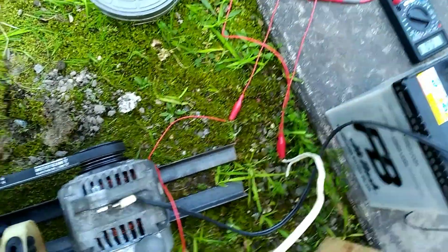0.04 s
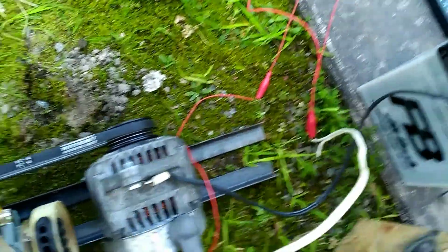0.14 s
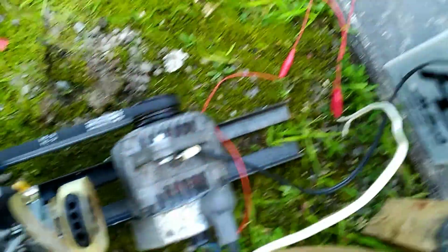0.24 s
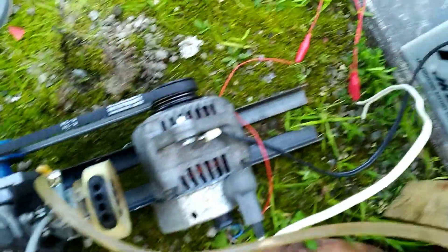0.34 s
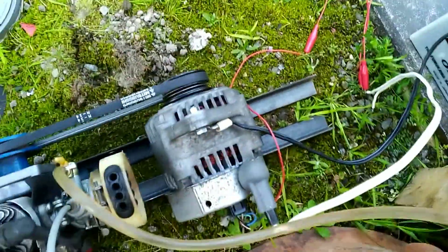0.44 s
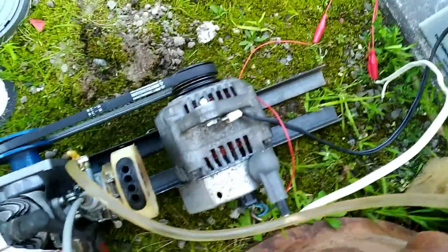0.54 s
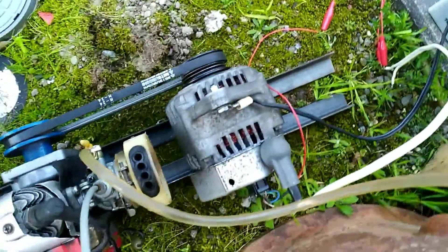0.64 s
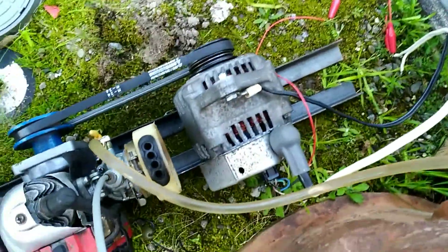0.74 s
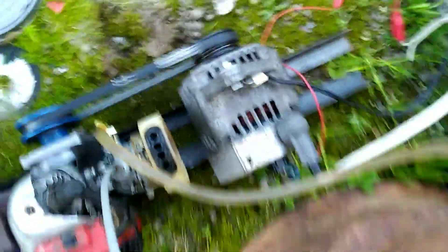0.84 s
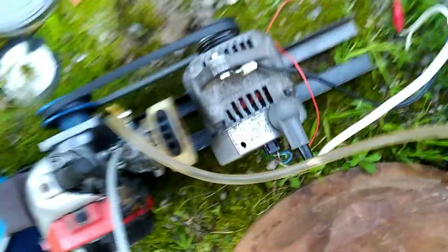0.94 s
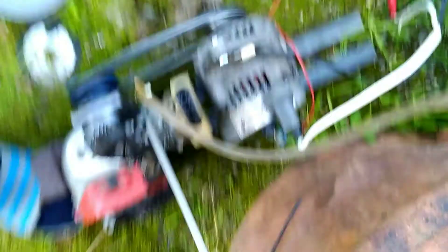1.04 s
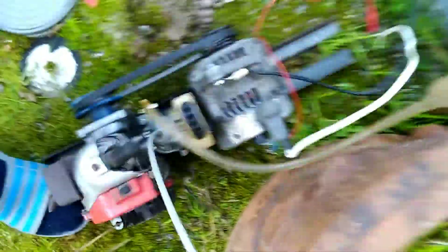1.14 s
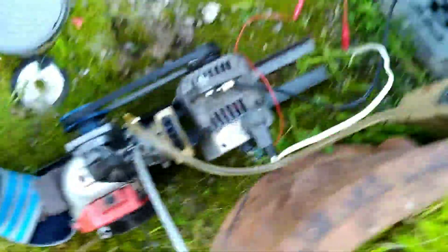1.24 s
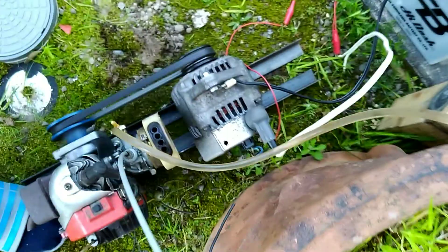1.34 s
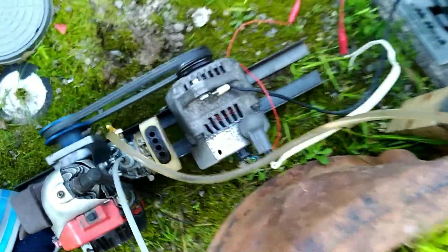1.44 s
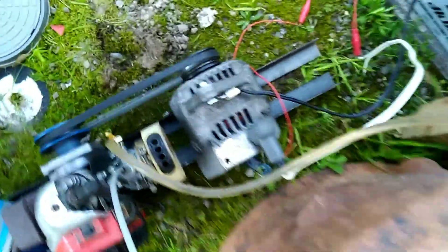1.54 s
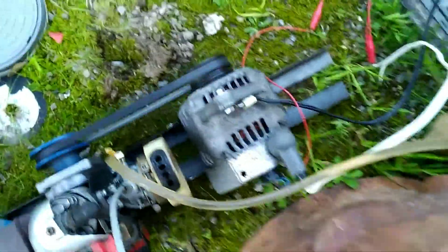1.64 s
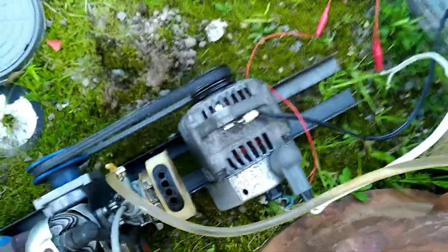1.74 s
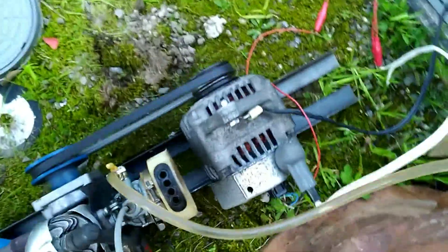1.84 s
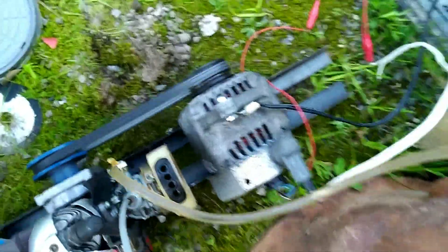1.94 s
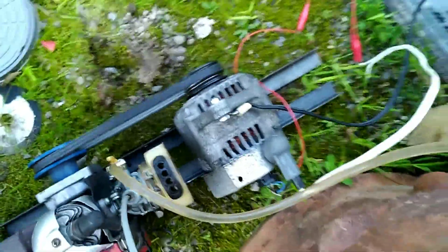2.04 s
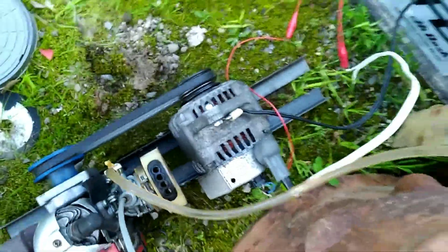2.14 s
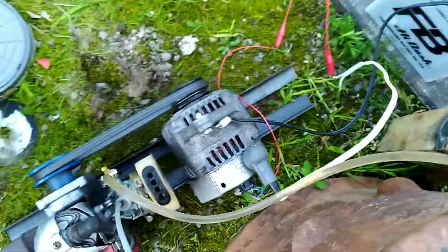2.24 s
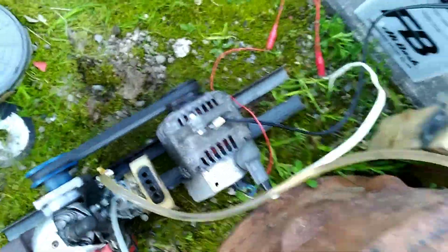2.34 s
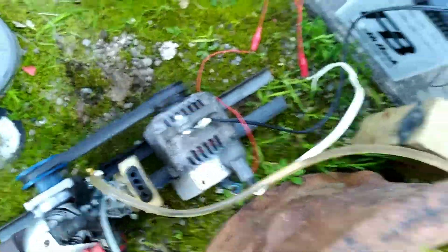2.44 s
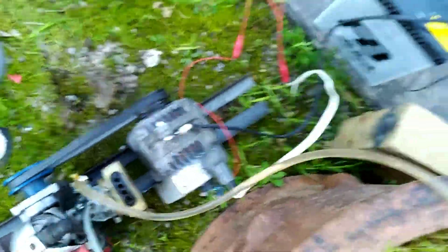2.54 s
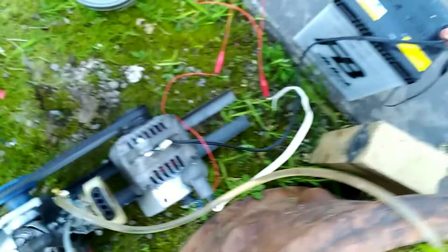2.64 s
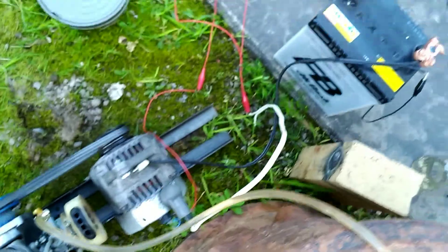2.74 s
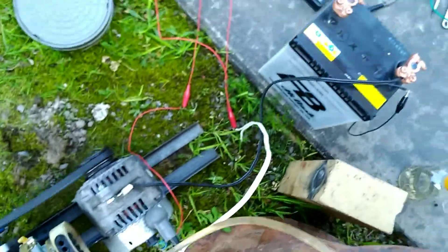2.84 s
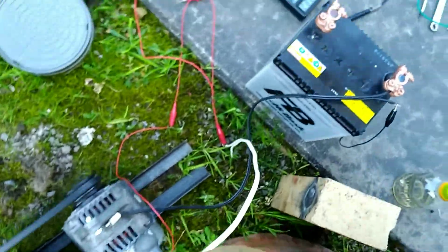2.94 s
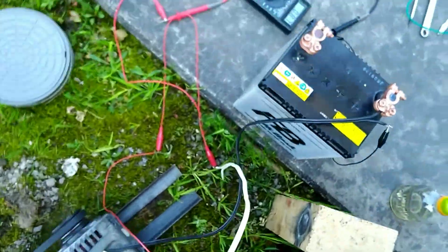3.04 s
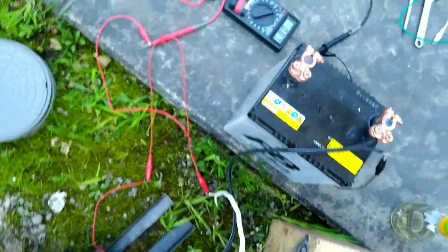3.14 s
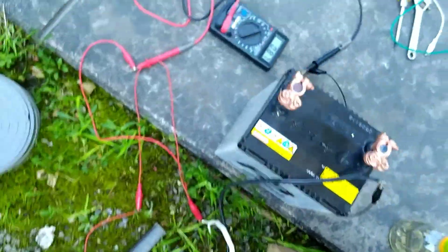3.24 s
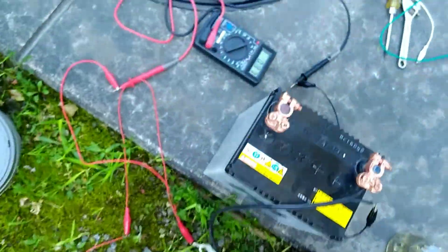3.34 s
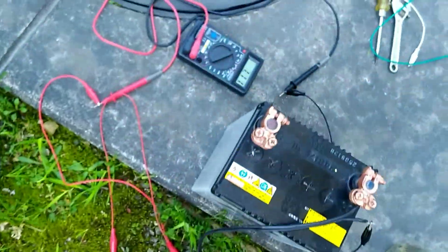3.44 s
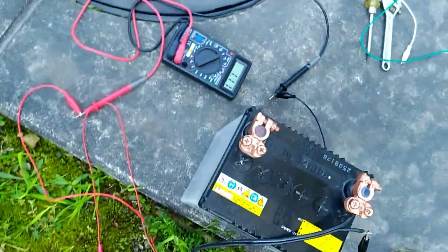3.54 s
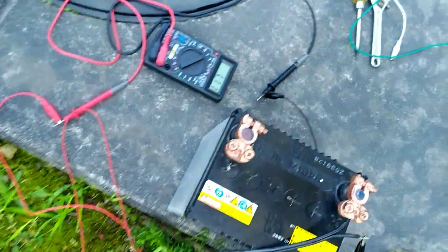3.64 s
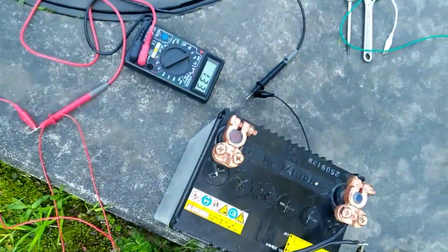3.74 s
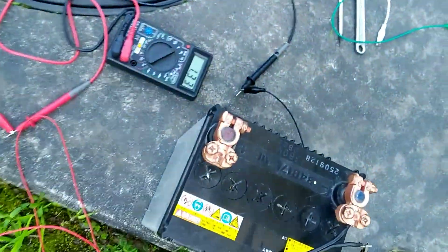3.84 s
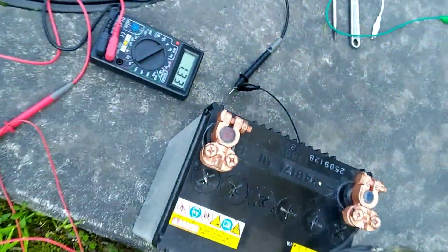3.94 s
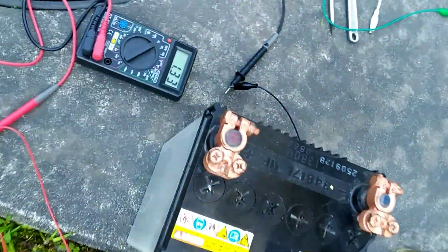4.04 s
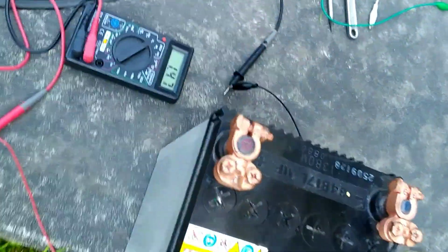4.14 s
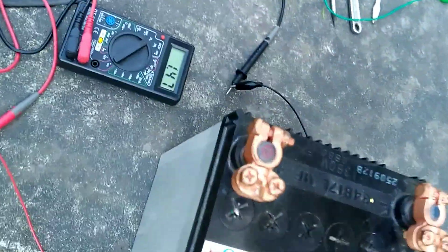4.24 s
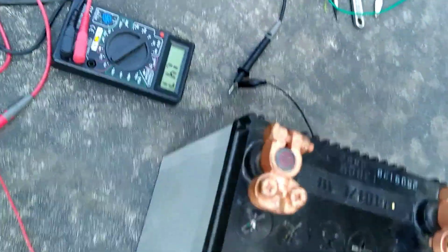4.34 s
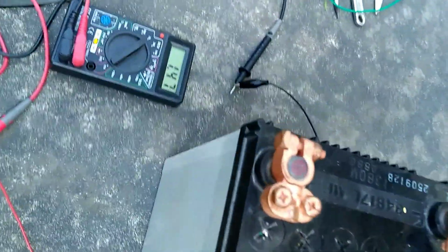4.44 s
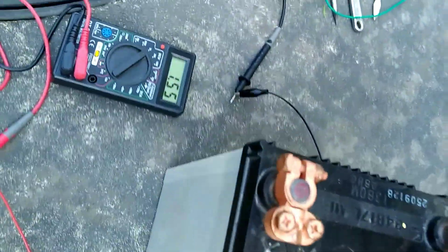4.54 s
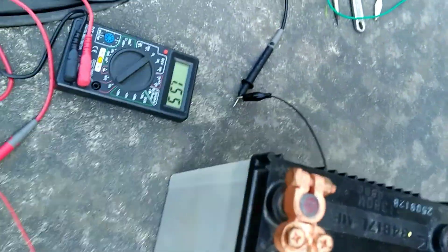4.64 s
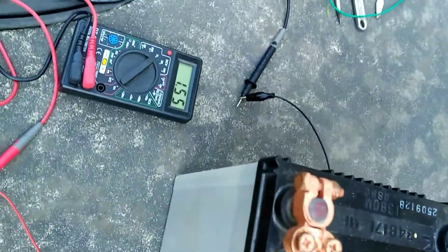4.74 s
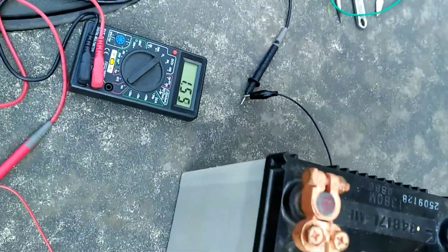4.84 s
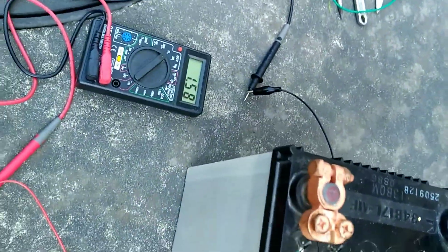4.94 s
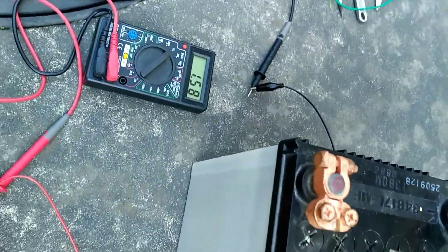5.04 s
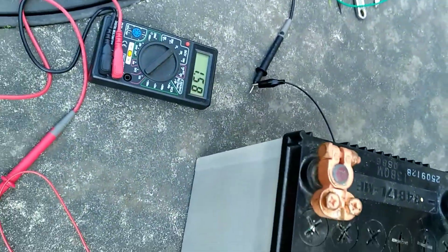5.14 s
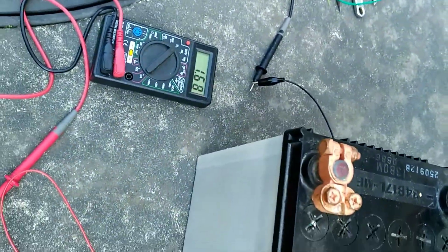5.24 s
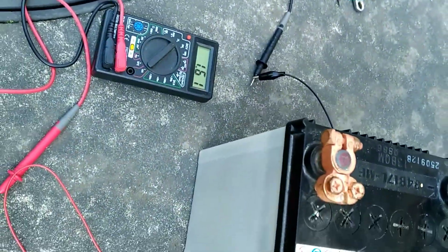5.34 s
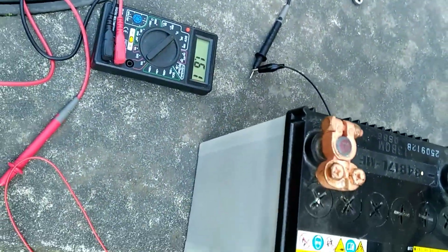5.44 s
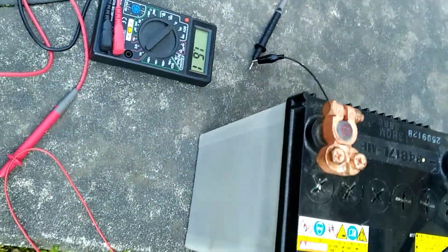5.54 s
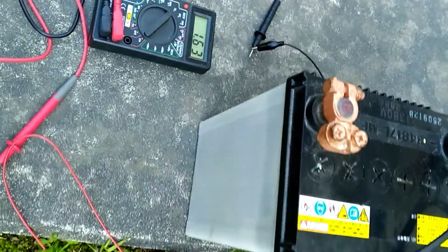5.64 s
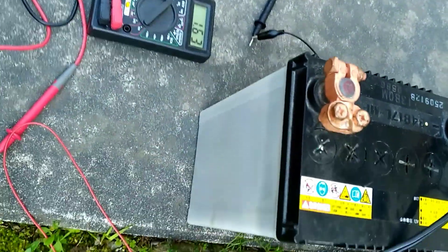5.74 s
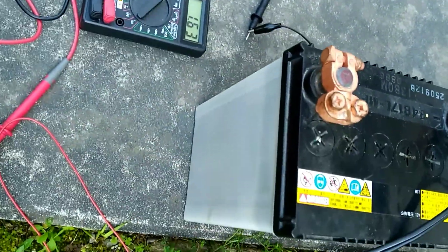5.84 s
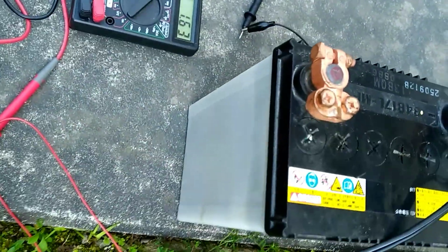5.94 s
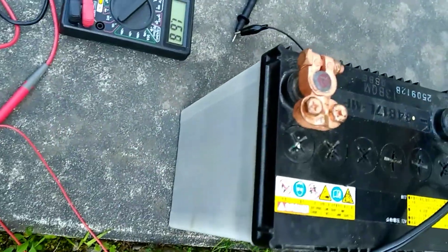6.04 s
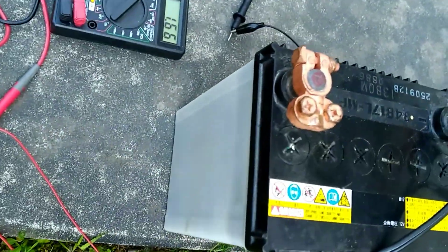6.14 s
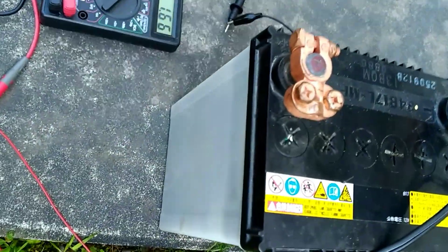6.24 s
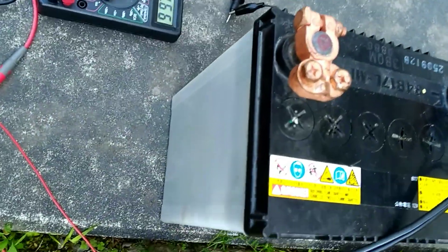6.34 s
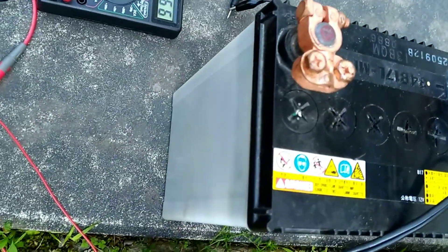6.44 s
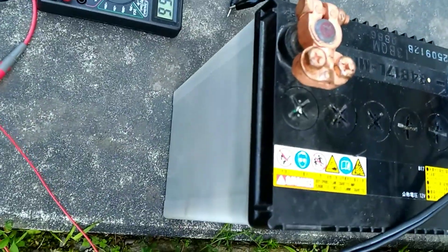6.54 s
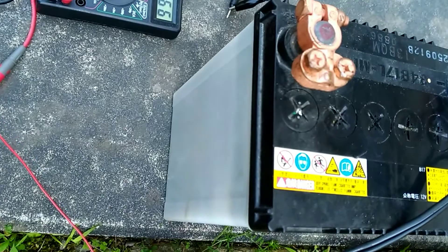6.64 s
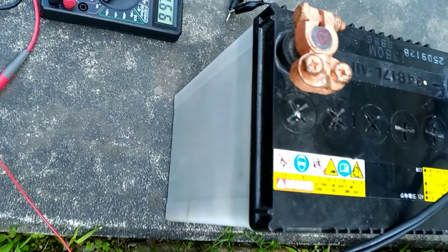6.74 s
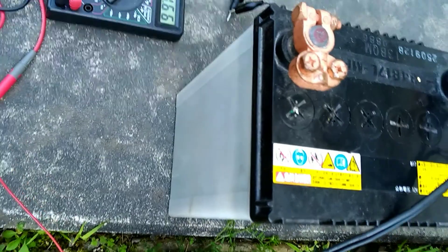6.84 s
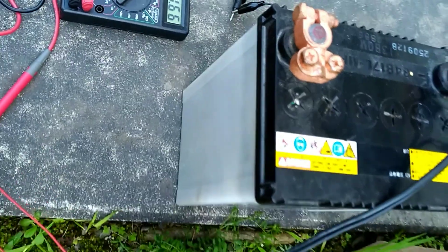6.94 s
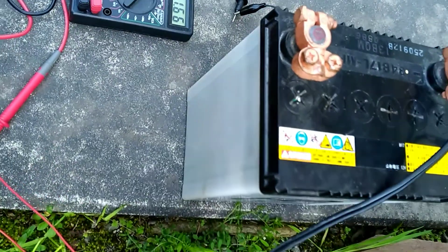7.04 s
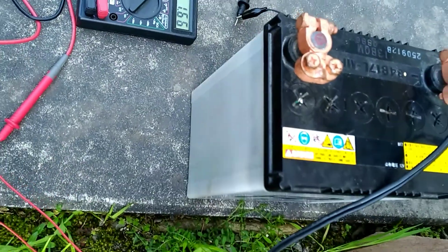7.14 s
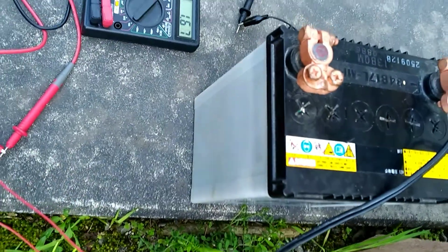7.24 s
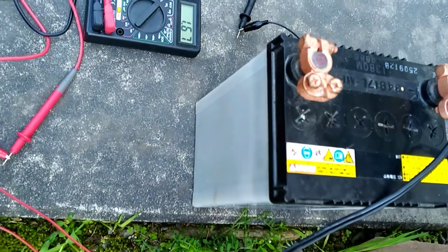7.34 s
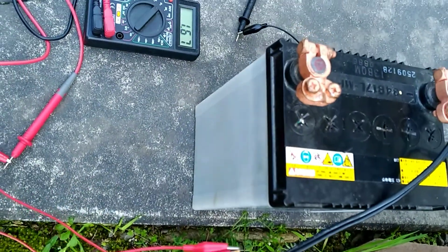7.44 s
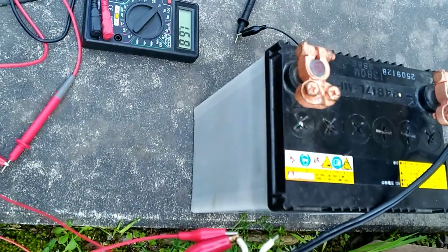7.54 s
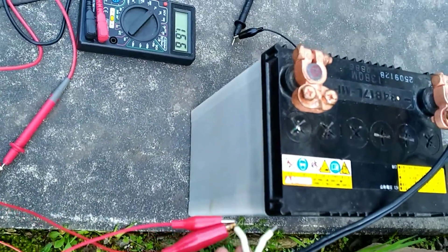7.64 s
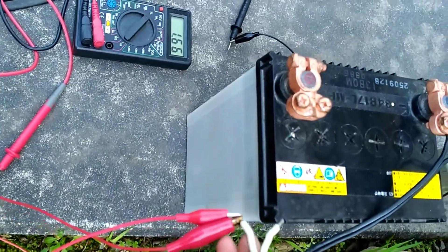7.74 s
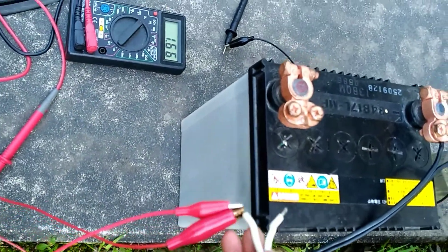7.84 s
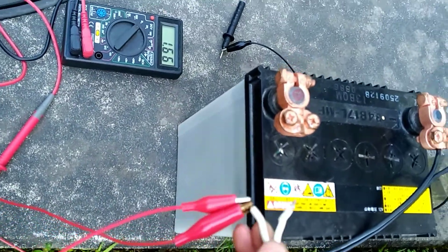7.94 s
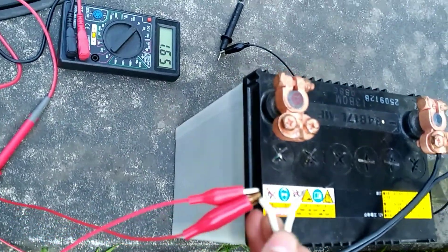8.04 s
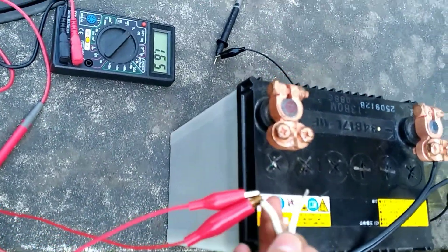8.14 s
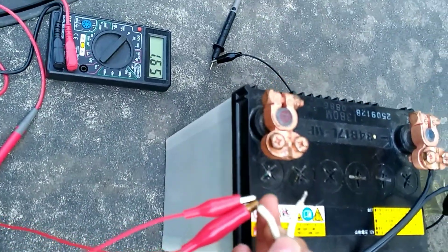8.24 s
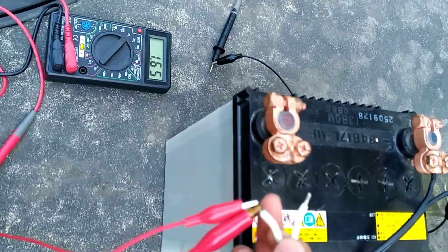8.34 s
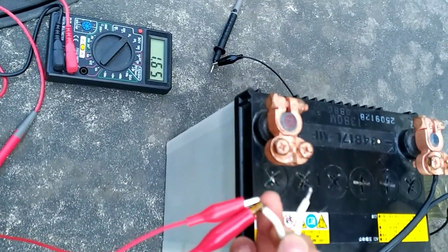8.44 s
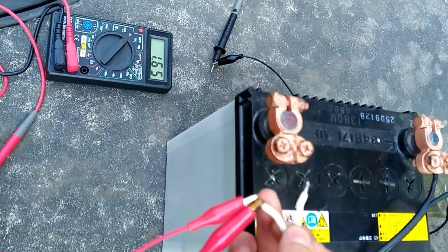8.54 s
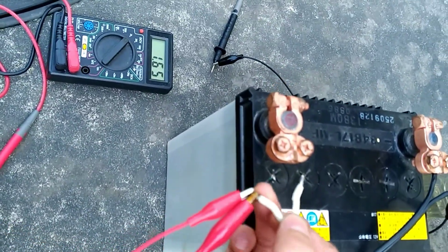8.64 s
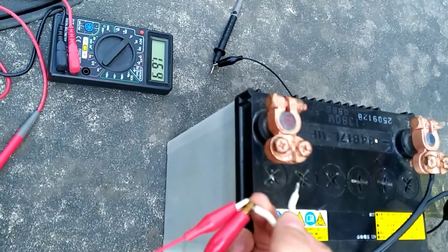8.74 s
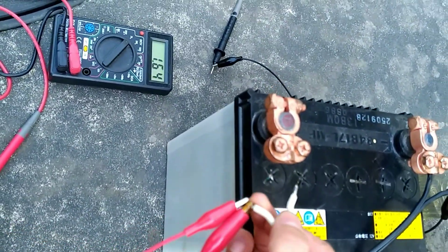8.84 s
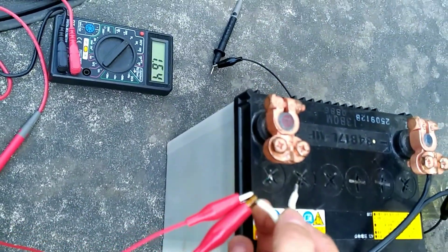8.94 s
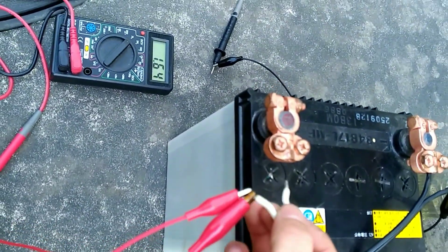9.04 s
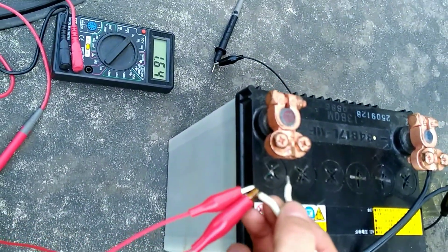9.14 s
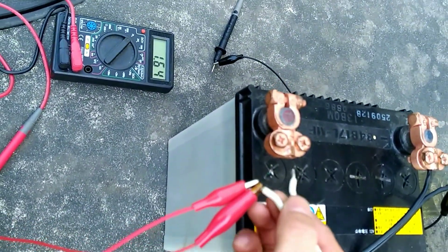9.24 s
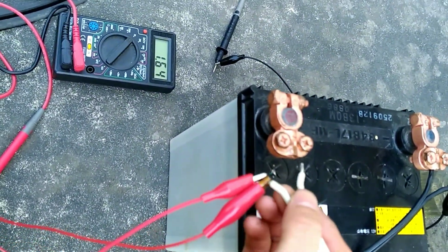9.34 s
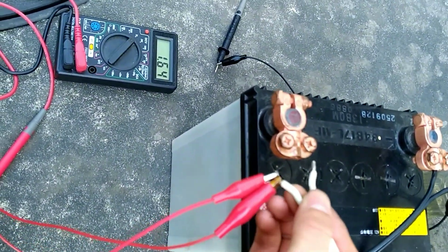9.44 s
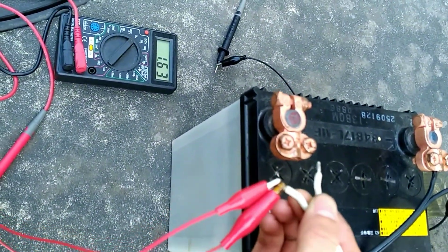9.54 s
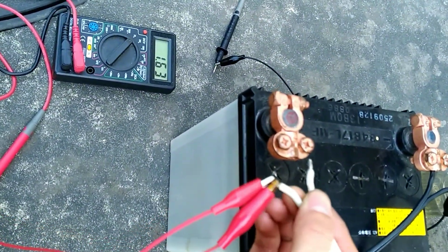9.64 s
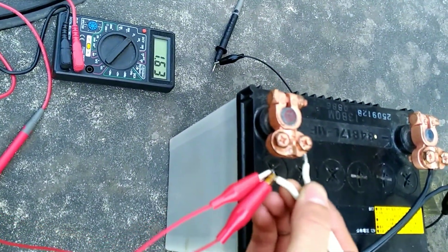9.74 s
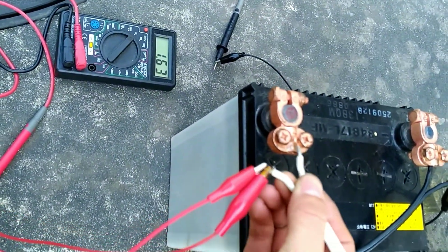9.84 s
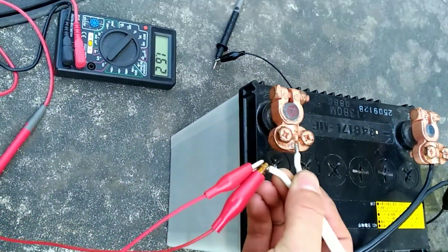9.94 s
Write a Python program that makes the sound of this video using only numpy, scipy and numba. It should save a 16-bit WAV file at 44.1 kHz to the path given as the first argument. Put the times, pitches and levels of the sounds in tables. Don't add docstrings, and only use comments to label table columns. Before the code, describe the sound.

After a quiet moment, a small petrol engine is cord-started outdoors, sputters and clangs, then rattles along steadily with barking intake and belt hiss.

```python
import sys
import numpy as np
from scipy import signal
from scipy.fft import rfft, irfft
from scipy.io import wavfile
from scipy.ndimage import uniform_filter1d, map_coordinates
from numba import njit

SR = 44100
rng = np.random.default_rng(int(sys.argv[2]) if len(sys.argv) > 2 else 0)


def waveform_to_disk(signal):
    frames = np.transpose(np.atleast_2d(signal))
    scaled = np.clip(frames, -1, 1) * 32767
    samples = np.round(scaled).astype(np.int16)
    wavfile.write(sys.argv[1], SR, samples)


def level_to_linear(level):
    exponent = np.asarray(level, float) / 20
    return 10 ** exponent


N = 441000
T = np.arange(N) / SR
START_S = .8003

# (time [s], speed [turns/s])
SPEED = [(0.8, 17.47), (0.87, 42.7), (0.95, 54.37), (1.05, 59.49), (1.21, 62.61), (1.3, 50.2), (1.38, 62.5),
         (1.53, 52.9), (1.61, 53.88), (3.2, 53.66), (4.21, 58.5), (5.15, 60.96), (5.58, 62.59),
         (6.82, 62.82), (7.36, 62.12), (9.08, 61.57), (9.3, 59.87), (10.0, 61.52)]
# (time [s], turned from the engine [0-1], in the intake's beam [0-1],
# stepped back [0-1], intake throat resonance [Hz])
PHONE = [(.8, 0.23, 0.5, 0, 1070), (1.15, 0.26, 0, 0.07, 990), (1.3, 0.15, 0.05, 0.37, 1070),
         (1.6, 0.18, 0.17, 0.01, 1150), (2.2, 0.2, 0.2, 0.14, 1160), (2.8, 0.27, 0.62, 0.55, 1180),
         (3.1, 0.25, 0.75, 0.75, 1170), (3.4, 0.24, 0.88, 0.8, 1340), (3.7, 0.49, 1, 0.66, 1700),
         (4.2, 0.7, 1, 0.35, 1560), (4.9, 0.62, 1, 0.47, 1520), (5.5, 0.83, 0.88, 0.23, 1460),
         (5.85, 0.86, 1, 0.3, 1445), (6.3, 1, 0.35, 0, 1495), (7.2, 0.85, 0.57, 0.11, 1485),
         (7.7, 0.79, 0.65, 0.23, 1520), (8.5, 0.85, 0.44, 0.13, 1520), (10, 0.72, 0.68, 0.3, 1540)]


def curves(table):
    s, *columns = np.transpose(table)
    return [np.interp(T, s, c) for c in columns]


TURNED, IN_BEAM, STEPPED_BACK, THROAT_HZ = curves(PHONE)
CRANK_HZ = curves(SPEED)[0]


def heard(row):
    facing, turned, in_beam, back = row
    return facing + turned * TURNED + in_beam * IN_BEAM + back * STEPPED_BACK


def crank():
    # (time [s], crank late by [ms], spread [s])
    tugs = [(1.1, .45, .2), (1.33, -1.4, .025), (1.46, 1.4, .05), (1.6, 1.4, .07), (1.76, -1.2, .05),
            (2.1, .5, .05), (2.36, 1.1, .09), (2.65, 1.2, .1), (2.86, 1.8, .1), (3.45, -1.3, .08),
            (3.6, -1.5, .08), (4.08, -.7, .1), (4.24, -.8, .08), (4.84, -1.1, .12), (5.1, -.4, .15),
            (5.7, -.45, .15), (6.12, -1.1, .1), (6.46, .6, .05), (6.75, -.6, .2), (8.17, -.7, .05),
            (8.45, .35, .08), (9.24, .5, .06), (9.5, -.9, .13)]
    angle = np.cumsum(CRANK_HZ) / SR
    coarse = T[::400]
    late_s = sum(ms * np.exp(-((coarse - s) / spread) ** 2) for s, ms, spread in tugs) / 10 ** 3
    return np.interp(T - np.interp(T, coarse, late_s), T, angle - np.interp(START_S, T, angle))


ANGLE = crank()


def unit(x):
    return x / np.sqrt(np.mean(x[..., N // 10:] ** 2))


def sides(pan_db):
    return level_to_linear(np.array([pan_db, -pan_db]) / 2)


def delayed(x, ms):
    return np.interp(T - ms / 10 ** 3, T, x)


@njit
def svf(x, hz, width):
    y, b, l, last, g, k = np.empty(len(x)), 0., 0., 0., 0., 0.
    for i in range(len(x)):
        if hz[i] != last:
            last, g, k = hz[i], np.tan(np.pi * hz[i] / SR), width / hz[i]
        v = (b + g * (x[i] - l)) / (1 + g * (g + k))
        b, l, y[i] = 2 * v - b, l + 2 * g * v, k * v
    return y


def ring(x, hz, width):
    return svf(x + 1e-18, hz + np.zeros(N), float(width))


def lift(x, hz, width, db):
    return x + (level_to_linear(db) - 1) * ring(x, hz, width)


def colour(table, shared_hz):
    hz = np.maximum(np.arange(N // 2 + 1) * SR / N, 1)
    mid, side = rfft(rng.standard_normal((2, N)))
    side = side * np.minimum(hz / shared_hz, 1)
    table_hz, table_db = np.transpose(table)
    gain = level_to_linear(np.interp(np.log(hz), np.log(table_hz), table_db))
    return unit(irfft(gain * np.array([mid + side, mid - side]), N))


def white(shared_hz):
    # (frequency [Hz], level [dB per Hz])
    flat = [(1, 0), (SR, 0)]
    return colour(flat, shared_hz)


def walk(rate):
    k = int(SR / rate)
    return .85 * uniform_filter1d(np.repeat(rng.standard_normal(N // k + 1), k), k)[:N]


def blows(table):
    s, db = np.transpose(table)
    return np.bincount((s * SR).astype(int), level_to_linear(db), N)


def strokes(turns, sizes, jitter_s):
    at = (np.interp(turns, ANGLE, T, right=20) + jitter_s * rng.standard_normal(len(turns))) * SR
    return np.bincount(np.minimum(at, N).astype(int), sizes, N + 1)[:N]


def fade(x, rise_s, fall_s):
    for s in (rise_s, fall_s):
        x = signal.lfilter([1], [1, -np.exp(-1 / (s * SR + 1))], x)
    return x / x.max()


def fired():
    rhythm = [(0, 1), (2, 2), (14, 3), (26, 2), (30, 3), (33, 2), (217, 3), (223, 2), (229, 3), (487, 2),
              (489, 3), (492, 2), (510, 3)]
    lit = np.zeros(int(ANGLE[-1]) + 2, bool)
    for (start, step), (end, _) in zip(rhythm, rhythm[1:] + [(len(lit), 0)]):
        lit[start:end:step] = True
    return lit


def running():
    catch_db, catch_s = -16, 0.036
    return (T > START_S) * level_to_linear(catch_db * np.exp(-np.maximum(T - START_S, 0) / catch_s))


def yard():
    # (frequency [Hz], level [dB per Hz])
    air_spectrum = [(18, -44), (30, -26), (64, -7), (132, -4), (346, -22), (716, -20), (774, -23),
                    (3500, -42), (11000, -47), (13000, -40), (15000, -45)]
    air_db = -63.5
    # (frequency [Hz], level [dB])
    mains = [(60, -72), (180, -83), (240, -86), (600, -97), (660, -86), (720, -76.5), (780, -99),
             (840, -86)]
    hum = sum(np.sqrt(2) * level_to_linear(db) * np.sin(2 * np.pi * hz * T) for hz, db in mains)
    swish = np.array([ring(n, 1600, 2000) for n in white(2000)])
    rustle = level_to_linear(-65.5) * np.exp(-((T - .1) / .15) ** 2) * swish
    return level_to_linear(air_db + 2.0 * walk(13.5)) * colour(air_spectrum, 850) + rustle + hum


def starter():
    # (time [s], clack peak [dB], scrape [dB], decay [s])
    pawls = [
        (0.675, -56, -65, 0.027),
        (0.693, -64, -61, 0.068),
        (0.714, -40, -28, 0.048),
        (0.728, -20, -13, 0.016),
        (0.742, -29, -43, 0.015),
        (0.76, -43.5, -22, 0.063),
        (0.778, -43, -47, 0.035),
        (0.791, -14.5, -28, 0.0048),
        (0.81, -16, -6, 0.0081),
        (0.823, -41, -29, 0.63),
    ]
    # (frequency [Hz], width [Hz], level [dB])
    housing = [(500, 500, -20), (990, 280, -2), (1520, 220, -0.5), (1900, 320, -5.5), (2350, 190, -2.5),
               (3100, 290, -22)]
    clack, scrape = np.zeros((2, N))
    for s, db, scrape_db, decay_s in pawls:
        age = np.maximum(T - s, 0)
        shape = (1 - np.exp(-age / 0.005)) * np.exp(-np.log(1000) * age / decay_s)
        clack = clack + level_to_linear(db) * shape
        scrape = scrape + level_to_linear(scrape_db) * shape
    noise = white(4200)
    clacks = [sum(level_to_linear(db + 27) * ring(clack * n, hz, width) for hz, width, db in housing) for n in noise]
    return clacks + scrape * np.array([ring(n, 7800, 11000) for n in noise])


def coughs():
    # (time [s], level [dB])
    compressions = [
        (.759, -39),
        (.788, -31),
        (.7985, -18.5),
    ]
    return level_to_linear(43.5) * ring(ring(blows(compressions), 143, 110), 150, 220)


def whistle(lit, turns):
    tone = ring(ring(strokes(turns - .01, lit * 1., 3e-5), 3080, 130), 2970, 100)
    jet = fade(strokes(turns - .02, lit * 1., 1e-4), 0.00086, 0.0027)
    breath = np.array([ring(ring(jet * n, 2640, 250), 3250, 300) for n in white(4600)])
    return unit(unit(tone) + 0.35 * unit(breath))


def exhaust(lit, turns):
    # (facing it [dB], change when turned [dB], in the beam [dB], stepped back [dB])
    pop_row = (-25.5, -0.7, -1.53, -4.5)
    whistle_row = (-30, -40, 6.5, -13)
    echo_row = (-24.5, 1, 13.5, -14)
    bass_row = (8.5, -3.5, 3.5, -3)
    boom_row = (-7, 11.5, -1.5, 7)
    body_row = (0.42, 3, 0.11, 0.21)
    squeeze_row = (-47, 5.5, 7, -6.5)
    thump_row = (-44, 0.5, 1.5, -7.5)
    pop_pan_row = (5.4, 1.5, 0.23, .3)
    # (frequency [Hz], width [Hz], lift [dB])
    muffler = [(139.4, 45, 8), (202, 190, 1.5), (304.4, 41.4, 13), (230, 34, 3), (544, 20.5, 5.5),
               (1000, 1130, 12), (483, 425, -7.5), (485, 70, 10), (664, 123, 5)]
    # (delay facing the engine [ms], added when turned [ms])
    step_ms = (5.39, 1.7)
    # (multiple [x crank rate],
    # width [Hz], lift when turned [dB], lift in the beam [dB])
    ridges = [(10.55, 59, -0.5, 5), (14, 17, -12, 14.5), (11.8, 48, 6, -2.5)]
    # (late [ms], facing [dB], change when turned [dB])
    faces = [(3.4, -5, -2), (4.8, 7.5, -44), (6.3, 2.5, -19)]
    # (frequency [Hz], width [Hz], lift [dB])
    facing = [(130, 37, 5.5), (322, 23, -4), (432, 55, -8), (490, 46, 5), (604, 59, -7), (717, 65, 3),
              (890, 89, -3), (906, 68, 4.5)]

    uneven_db, late_s = .6 * rng.standard_normal(len(lit)), 3e-5
    port = strokes(turns + 0.01, np.where(lit, 1, -level_to_linear(-6.5)) * level_to_linear(uneven_db), late_s)
    pop = ring(ring(fade(port, .0001, 0.0005), 316, 1180), 482, 900)
    for hz, width, db in muffler:
        pop = lift(pop, hz, width, db)
    pop = lift(pop, 385, 300, heard(boom_row))
    pop = lift(pop, 124, 278, heard(bass_row))
    pop = lift(pop, 760, 140, heard(body_row))
    pop = pop + level_to_linear(heard(echo_row)) * delayed(pop, step_ms[0] + step_ms[1] * TURNED)
    for order, width, turned_db, beam_db in ridges:
        pop = lift(pop, order * CRANK_HZ, width, heard((0, turned_db, beam_db, 0)))
    bright = ring(pop, 1145, 1830)
    for ms, db, turned_db in faces:
        pop = pop + level_to_linear(db + turned_db * TURNED) * delayed(bright, ms)
    for hz, width, db in facing:
        pop = lift(pop, hz, width, db * (1.5 - TURNED))
    pop = unit(delayed(pop, -.05 * (1 - TURNED)))
    squeeze = ring(ring(strokes(turns[1:] - .2, level_to_linear(uneven_db[1:]), late_s), 533, 560), 267, 1250)
    thump = ring(ring(port, 75, 76), 97, 110)
    extra = level_to_linear(heard(squeeze_row)) * unit(squeeze) + level_to_linear(heard(thump_row)) * unit(thump)
    extra = extra + level_to_linear(heard(whistle_row)) * whistle(lit, turns)
    pop_gain = level_to_linear(heard(pop_row))
    middle = pop_gain * ring(pop, 620, 330) * np.array([[0], [.45]])
    return (pop_gain * pop + middle + extra) * sides(heard(pop_pan_row)) * running()


def crack(lit, turns):
    # (facing it [dB], change when turned [dB], in the beam [dB], stepped back [dB])
    crack_row = (-32.5, -1, 0, -4)
    crack_pan_row = (2.5, -4.5, 1, -4)
    # (facing the engine [ms], added when turned [ms])
    crack_late_ms = (-.17, .85)
    edge = strokes(turns + .014, lit * level_to_linear(.8 * rng.standard_normal(len(lit))), 3e-5)
    stub = ring(fade(edge, .00008, .0001), 1200, 560)
    stub = unit(delayed(stub, crack_late_ms[0] + crack_late_ms[1] * TURNED))
    return level_to_linear(heard(crack_row)) * stub * sides(heard(crack_pan_row)) * running()


def intake(lit, turns):
    # (facing it [dB], change when turned [dB], in the beam [dB], stepped back [dB])
    bark_row = (-34.5, 7, 1, 0)
    gasp_row = (-46.5, 2.5, 15, -1)
    knock_row = (-28.5, -7, -0.5, -2.5)
    clink_row = (-54, 8.5, 11.5, -1.5)
    bark_pan_row = (-11, 22, 6.5, 8)
    gasp_pan_row = (-12.5, -2, 6.5, 20.5)
    knock_pan_row = (0.5, -9, 0, -2)

    uneven_db, late_s = 1.2 * rng.standard_normal(len(lit)), 4e-5
    snap_turns = turns + .475 - 0.025 * np.interp(turns, ANGLE, TURNED)
    snap = strokes(snap_turns, level_to_linear(np.where(lit, 0, -1.) + uneven_db), late_s)
    slap = strokes(turns - .03, level_to_linear(-13 + 3.5 * rng.standard_normal(len(lit))), 0.00018)
    blast = strokes(turns + 0.027, lit * 1., late_s)
    noise = white(5200)
    bark = -ring(ring(ring(snap + .2 * slap, THROAT_HZ, 530), THROAT_HZ, 470), THROAT_HZ, 530)
    knock = ring(.3 * fade(blast, .0001, .0001) - fade(snap, .00012, .00015), 620, 1700)
    puff = fade(snap + slap, .0008, .0025)
    gulp = fade(snap + .3 * slap, .0005, .003)
    gulp = gulp + .6 * fade(strokes(turns, lit * 1., late_s), .0002, .001)
    rasp = np.array([ring(ring(n * (puff + 0.21), THROAT_HZ * 1.23, 410), THROAT_HZ, 1800) for n in noise])
    gasp = np.array([ring(ring(n * (gulp + 0.0031), 4460, 1040), 5200, 3700) for n in noise])
    throat = unit(unit(bark) + level_to_linear(-11) * unit(rasp))
    racing_db, racing_s = 5, 0.41
    bark_db = heard(bark_row) + racing_db * np.exp(-np.maximum(T - 1.1, 0) / racing_s)
    bark_pan_db = heard(bark_pan_row)
    air = level_to_linear(bark_db) * sides(bark_pan_db) * throat
    air = air + level_to_linear(heard(gasp_row)) * sides(heard(gasp_pan_row)) * unit(gasp)
    clink = unit(ring(ring(slap, 1796, 160), 1900, 690))
    air = air + level_to_linear(heard(clink_row)) * sides(bark_pan_db / 2) * clink
    return running() * (air + level_to_linear(heard(knock_row)) * sides(heard(knock_pan_row)) * unit(knock))


def works(lit, turns):
    # (facing it [dB], change when turned [dB], in the beam [dB], stepped back [dB])
    hiss_row = (-25.5, -17.5, 5.5, -18)
    rattle_row = (-26.5, -0.5, 3, -6.5)
    hiss_pan_row = (2.4, .3, 6.2, 5.9)
    # (frequency [Hz], width [Hz], level [dB])
    bands = [(4200, 1100, -6), (6050, 1200, -1), (9700, 640, 3), (12160, 5300, -4.5)]
    # (frequency [Hz], level [dB per Hz])
    frame = [(500, 8), (700, -1.5), (1100, -15), (1900, -11.5), (2300, -18), (3050, -22), (4400, -23.5),
             (8400, -29.5), (9900, -23.5), (14000, -41)]
    throb_floor = (0.038, 0.54)

    thrust = level_to_linear(np.where(np.roll(lit, 1), 0, -6.) + 1.1 * rng.standard_normal(len(lit)))
    kick = fade(strokes(turns - .19, thrust, 0.0007), 0.0016, 0.0016)
    floor = throb_floor[0] + throb_floor[1] * TURNED
    noise = white(6900) * level_to_linear(2.0 * walk(600))
    hiss = [sum(level_to_linear(db) * ring(ring(n, hz, width), hz, width) for hz, width, db in bands) for n in noise]
    hiss = unit(np.array(hiss) * (kick + floor) * level_to_linear(2.8 * walk(13)))
    idle_buzz, buzz_db = .5, 2.4
    rattle = colour(frame, 2200) * (kick + idle_buzz) * level_to_linear(buzz_db * walk(300) + 0.25 * walk(21))
    rattle = unit(signal.lfilter(*signal.butter(4, 1000, "high", fs=SR), rattle))
    hiss = level_to_linear(heard(hiss_row)) * sides(heard(hiss_pan_row)) * hiss
    return running() * (hiss + level_to_linear(heard(rattle_row)) * rattle)


def shake():
    # (multiple [x crank rate], level [dB])
    unbalance = [(1, -50), (2, -43.5), (3, -54)]
    # (facing it [dB], change when turned [dB], in the beam [dB], stepped back [dB])
    shake_row = (3, 2, 6.5, -18.5)
    angle = 2 * np.pi * ANGLE
    throb = sum(level_to_linear(db + heard(shake_row)) * np.cos(order * angle) for order, db in unbalance)
    rumble = level_to_linear(-51) * unit(ring(rng.standard_normal(N), 74, 70))
    return np.clip((T - START_S - .04) / 0.04, 0, 1) * (throb + rumble) * np.array([[1.2], [.8]])


def spits():
    # (time [s], level [dB])
    bursts = [
        (.978, -28),
        (1.022, -14),
        (1.238, -21),
        (1.328, -25),
    ]
    puffs = fade(blows(bursts), .0005, 0.0063)
    return puffs * level_to_linear(-15.5) * np.array([ring(n, 4000, 8000) for n in white(4000)])


def clangs():
    # (time [s], level [dB])
    strikes = [
        (.978, -18),
        (1.03, -15),
        (1.143, -11),
        (1.19, -17),
        (1.385, -15),
    ]
    return level_to_linear(38.5) * ring(ring(blows(strikes), 1780, 90), 1660, 300)


def bracket():
    # (time [s], peak [dB])
    pings = [(4.0348, -9), (4.1386, -9.5), (4.3626, -13), (4.5327, -12), (4.6319, -22), (4.8474, -18),
             (4.946, -3), (5.1133, -7), (5.1942, -14), (5.3578, -19), (5.5349, -6), (5.6466, -32),
             (5.8217, -27), (5.8866, -23)]
    taps = (fade(blows(pings), 0.0021, 0.0038) + 0.14 * (T > 3.8) * (T < 6.1)) * level_to_linear(-11.5)
    return 9 * np.array([ring(taps * n, 2053, 97) for n in white(4200)])


def walls(x):
    t60_s, level_db = .11, -16
    t = T[:SR // 3]
    common, own = rng.standard_normal(len(t)), rng.standard_normal((2, len(t)))
    tail = (common + 0.54 * own) * (t > .003) * np.exp(-np.log(1000) * t / t60_s)
    tail = tail / np.sqrt(np.sum(tail ** 2) / 2)
    return level_to_linear(level_db) * signal.fftconvolve(x, tail, axes=1)[:, :N]


def scene():
    # (facing it [ms], change when turned [ms], in the beam [ms], stepped back [ms])
    lag_row = (-.02, .1, -.05, -.12)
    lit = fired()
    turns = np.arange(len(lit))
    background = yard()
    pops = starter() + coughs() + exhaust(lit, turns) + crack(lit, turns)
    air = intake(lit, turns)
    frame_noise = works(lit, turns) + shake()
    pops = pops + spits() + clangs() + bracket()
    left, right = pops + air + walls(pops + air / 2) + frame_noise + background
    late = map_coordinates(left, [(T - heard(lag_row) / 10 ** 3) * SR], mode="mirror")
    return np.array([late, right])


def top_cut(x):
    return signal.sosfilt(signal.butter(12, 15370, fs=SR, output="sos"), x)


def record(dry):
    rounded = np.tanh(1.197 * dry) / 1.258
    band = signal.sosfilt(signal.butter(6, 48, "high", fs=SR, output="sos"), rounded)
    band = signal.sosfilt(signal.ellip(8, .3, 70, 14250, fs=SR, output="sos"), band)
    return top_cut(band)


dry = scene()
out = record(dry)
waveform_to_disk(out)
```